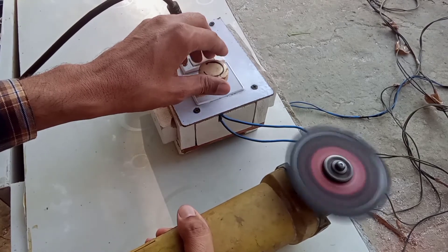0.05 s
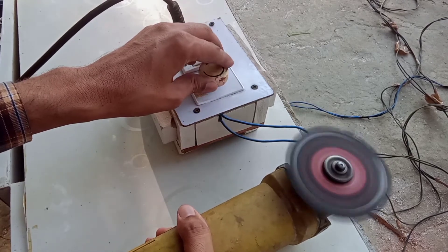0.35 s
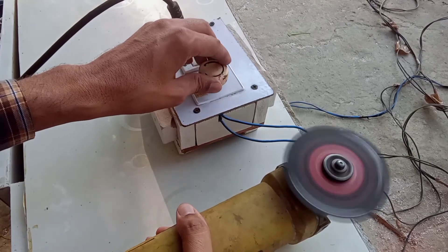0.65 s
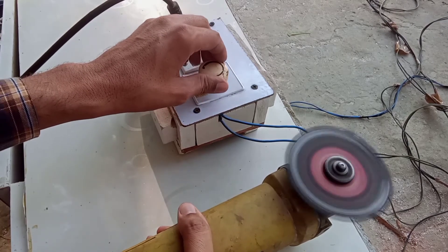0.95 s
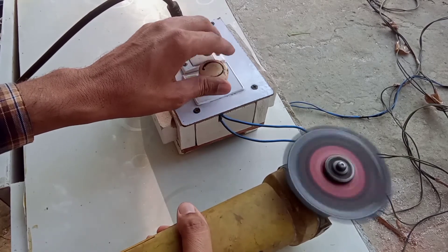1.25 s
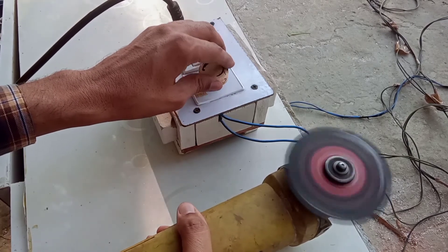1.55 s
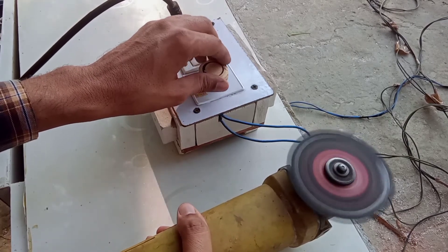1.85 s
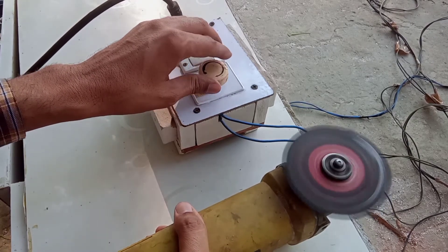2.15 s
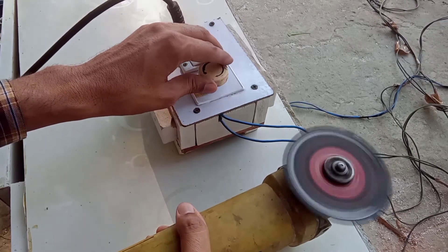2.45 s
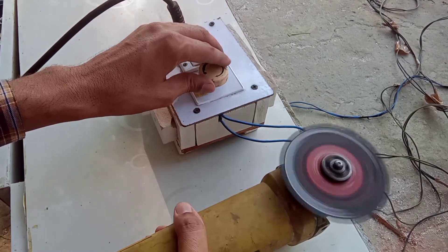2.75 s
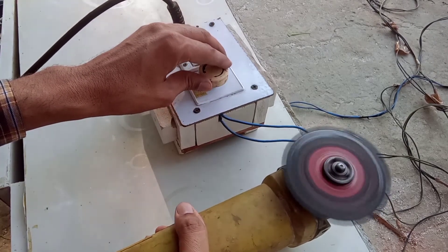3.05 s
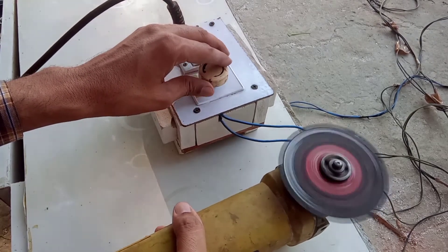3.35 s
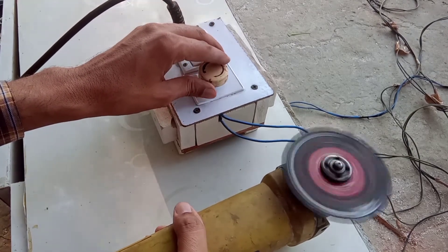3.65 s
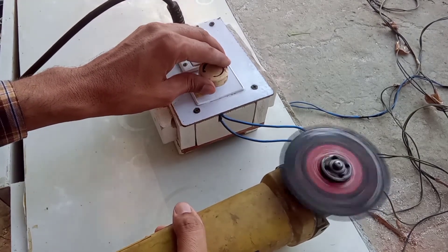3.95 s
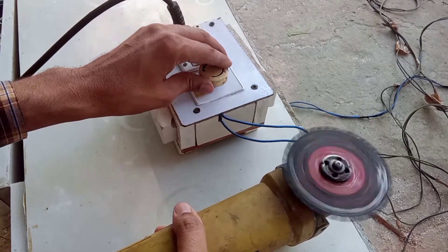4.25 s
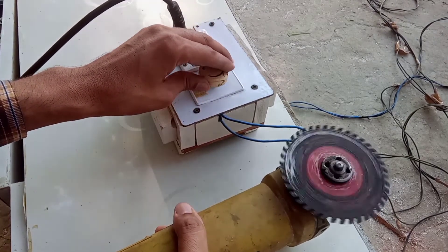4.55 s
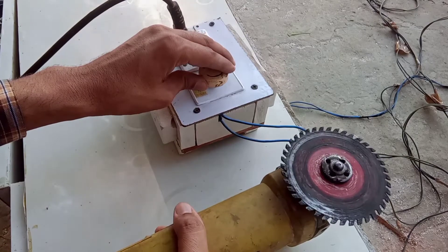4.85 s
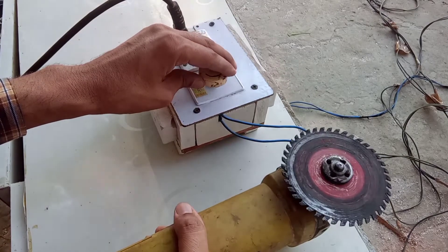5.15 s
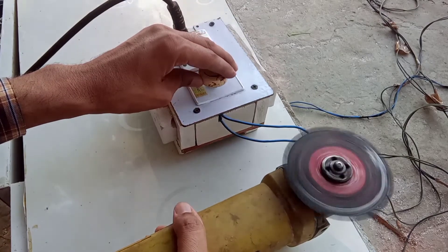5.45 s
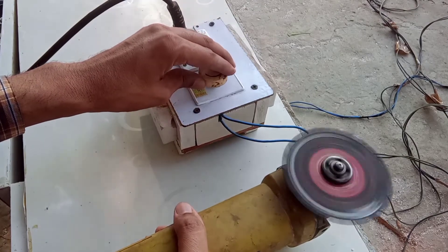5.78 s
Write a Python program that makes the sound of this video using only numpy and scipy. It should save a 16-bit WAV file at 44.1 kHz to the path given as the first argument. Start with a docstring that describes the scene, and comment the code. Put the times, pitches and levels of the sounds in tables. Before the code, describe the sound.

An angle grinder with a saw blade rattles and rings as it slows to a stop, then restarts with a clank and buzz.

```python
"""Loose gears knock and chatter close by, and every blow rings a toothed steel saw blade.
It is an angle grinder in a workshop, turned down on a dimmer dial: its whine, fan rasp and wind
fall away as it slows to a stop. A soft swish fills the pause; then the motor kicks in with a
clank, buzzes on the chopped mains and rattles up again."""
import sys
import numpy as np
from scipy import signal
from scipy.fft import rfft, irfft
from scipy.io import wavfile
from scipy.ndimage import uniform_filter1d, minimum_filter1d

SR = 44100
rng = np.random.default_rng(int(sys.argv[2]) if len(sys.argv) > 2 else 0)


def dump_mix(stems):
    """Bounce the given channels to the path in sys.argv[1] as a 16-bit WAV at rate SR."""
    frames = np.atleast_2d(stems).T  # one column per channel
    limited = np.clip(frames, -1, 1)  # hard clip at full scale
    pcm = np.round(limited * 32767).astype(np.int16)
    wavfile.write(sys.argv[1], SR, pcm)


N = 265480
TIME = np.arange(N) / SR
RESTART_S, MAINS_PULSE_HZ = 5.385, 100
FREE_FLIGHT_S, SETTLING_S = .018, .016  # teeth before and after a heavy knock


def undb(db):
    """Decibels to gain."""
    return 10 ** (np.asarray(db) / 20)


def unit(x):
    """Scale to rms 1."""
    return x / np.sqrt(np.mean(x ** 2))


def walk(rate_hz):
    """Smooth random drift, rms 1."""
    hold = int(SR / rate_hz)
    steps = np.repeat(rng.standard_normal(N // hold + 1), hold)
    return unit(uniform_filter1d(uniform_filter1d(steps, hold), hold)[:N])


def colour(x, points, size=4096):
    """Minimum-phase filter through (f/Hz, level/dB); white noise keeps its power."""
    hz, db = np.transpose(points)
    gain = unit(undb(np.interp(np.log(np.fft.rfftfreq(size, 1 / SR) + 1), np.log(hz), db)))
    cepstrum = irfft(np.log(gain))
    cepstrum[1:size // 2] *= 2
    cepstrum[size // 2 + 1:] = 0
    return signal.fftconvolve(x, irfft(np.exp(rfft(cepstrum))))[:N]


# armature rotation: t/s, f/Hz
SPEED = [(0, 102), (.7, 94.5), (1.1, 83), (1.5, 69.5), (1.95, 60), (2.7, 40.5), (3.3, 27), (4, 13),
         (4.56, 6), (4.62, 1.5), (4.77, 3), (4.82, 0), (5.38, -1), (5.42, 7), (5.7, 15), (6.02, 32.5)]

def armature():
    """Run-down, stop and restart: speed in Hz, and pace as a share of top speed."""
    speed_hz = np.maximum(np.interp(TIME, *np.transpose(SPEED)), 0)
    return speed_hz, speed_hz / speed_hz.max()


def force_db(speed_hz, knee_hz=41.7):
    """Tooth force grows with speed and levels off above the knee."""
    return 20 * np.log10(speed_hz / np.hypot(speed_hz, knee_hz) + 1e-4)


def contacts(rate_hz, scatter_db, length_s):
    """Random light contacts of uneven size, each a short scrape; rms 1."""
    clicks = (rng.random(N) < rate_hz / SR) * undb(scatter_db * np.clip(rng.standard_normal(N), -2, 2))
    power = signal.lfilter([1], [1, -np.exp(-2 / (length_s * SR))], clicks ** 2)
    return unit(np.sqrt(power) * rng.standard_normal(N))


def coasting_chatter(speed_hz, case_db=-26, blade_db=-20.5):
    """Forces on case and blade: the unloaded gears chatter more thinly as they slow."""
    force = contacts(rate_hz=200 + 6 * speed_hz, scatter_db=3.5, length_s=.0034)
    force = force / np.sqrt(uniform_filter1d(force ** 2, size=8000)) * (TIME < RESTART_S)
    tooth_db = force_db(speed_hz)
    return force * undb([case_db + 1.23 * tooth_db, blade_db + 2.6 * tooth_db])


# heavy knocks: t/s, relative level/dB, f/Hz where the blade rings most
KNOCKS = [(0.0752, -10, 2920), (0.186, -0.5, 3140), (0.2674, 3, 2970), (0.5092, -6.5, 3110),
          (0.6645, -4, 2940), (0.9442, -2, 3130), (1.055, 2, 3090), (1.1813, -13, 2900), (1.2336, -5, 3030),
          (1.495, -1, 2590), (1.517, -1, 2650), (1.6927, -2, 3110), (1.9137, 2.5, 3070),
          (1.9764, 2.5, 3050), (2.0021, 2, 2760), (2.146, 2.5, 2960), (2.2212, 1, 3120), (2.2708, 2, 2850),
          (2.3761, -5, 2610), (2.442, -2.5, 3060), (2.4621, -3, 2850), (2.55, -7, 3100), (2.802, -3, 3110),
          (2.8697, 3, 3060), (2.9905, -1.5, 2570), (3.051, -5, 3070), (3.1301, -12, 3130),
          (3.1721, -6, 3120), (3.2829, -2.5, 2880), (3.3182, -5.5, 3130), (3.3712, -8.5, 3090),
          (3.4078, -6.5, 2870), (3.452, -7, 3070), (3.4805, -6.5, 3140), (3.5702, -12, 3120),
          (3.6372, -8, 2870), (3.6742, -9.5, 2860), (3.737, -9.5, 2580), (3.7909, -7.5, 2830),
          (3.858, -10.5, 2860), (3.9, -16, 3120), (3.988, -11, 2830), (4.0468, -10.5, 3120),
          (4.1466, -12.5, 2860), (4.1928, -17, 2580), (4.2449, -15, 2840), (4.356, -19, 2850),
          (4.4023, -19, 2580), (4.4675, -25, 3098), (4.5118, -18.5, 2850), (4.5344, -23.5, 2850),
          (4.5578, -23, 3180), (4.7229, -35, 3144), (4.753, -29.5, 3110), (4.773, -35, 3110),
          (5.3856, -6.5, 3090), (5.468, -17.5, 2590), (5.5268, -14.5, 3110), (5.598, -10, 3120),
          (5.625, -8.5, 3080), (5.658, -5.5, 2850), (5.677, -8.5, 3120), (5.6924, -8.5, 3110),
          (5.7656, -11.5, 2580), (5.8705, -13, 2860), (5.96, -5.5, 3080)]
# teeth in mesh, chatter only: start/s, end/s
IN_MESH = [(.29, .36), (.565, .66)]

def knocks(speed_hz, base_rate_hz=20, per_turn=.36, rattle_db=-3.5, scatter_db=5):
    """Teeth slap across their play: heavy knocks, and a rattle between that thins as they slow."""
    heavy = np.array(KNOCKS)
    count = np.cumsum(base_rate_hz + per_turn * speed_hz) / SR
    jitter, size, tuning = rng.standard_normal((int(count[-1]) - 1, 3)).T
    times = np.interp(np.arange(len(jitter)) + .5 + .2 * jitter, count, TIME)
    tooth_db = force_db(np.interp(times, TIME, speed_hz))
    level_db = rattle_db + 1.49 * tooth_db + scatter_db * np.clip(size, -2, 1)
    ring_hz = heavy[:, 2].mean() + heavy[:, 2].std() * tuning
    gaps = IN_MESH + [(s - FREE_FLIGHT_S, s + SETTLING_S) for s in heavy[:, 0]]
    free = ~np.any([(times > start) & (times < end) for start, end in gaps], axis=0)
    rows = np.vstack([heavy, np.column_stack([times, level_db, ring_hz])[free]])
    return rows[np.argsort(rows[:, 0])].T


def blows(times, levels_db, length_s, bounce_s, bounce_db, rise_s):
    """Each blow is a short crunch followed by two weaker bounces."""
    power = np.zeros(N + SR)
    delays_s = np.cumsum(bounce_s * rng.uniform(.5, 2.3, (len(times), 2)), axis=1)
    power[(times * SR).astype(int)] += undb(levels_db) ** 2
    for k in range(2):
        power[((times + delays_s[:, k]) * SR).astype(int)] += undb(levels_db + (k + 2.5) * bounce_db) ** 2
    power = signal.lfilter([1], [1, -np.exp(-2 / (length_s * SR))], power[:N] + 1e-18)
    power = signal.lfilter([1 / (rise_s * SR)], [1, -np.exp(-1 / (rise_s * SR))], power)
    return np.sqrt(power) * rng.standard_normal(N)


def tooth_ticks(times, knock_db, speed_hz, floor_hz=3.5, loaded_db=-10):
    """A knock's bright tick follows tooth speed more than knock weight, and drops under load."""
    sharp_db = 1.02 * force_db(np.maximum(speed_hz, floor_hz))
    sharp_db += loaded_db * (TIME > RESTART_S + SETTLING_S)
    tick_db = -19 + .65 * knock_db + np.interp(times, TIME, sharp_db)
    return blows(times, tick_db, length_s=.0064, bounce_s=.0036, bounce_db=-6.5, rise_s=.00047)


# gear case spectrum: f/Hz, level/dB
CASE_COLOUR = [(150, -53), (300, -18), (480, -8), (720, -5.5), (920, -14.5), (1300, -0.5), (1470, -5),
               (1820, 8.5), (2100, -5.5), (2900, 7.5), (3450, -4), (4050, -14), (4600, -17.5), (6500, -45)]
# tooth tick spectrum: f/Hz, level/dB
TICK_COLOUR = [(2500, -19.5), (4000, 25.5), (5000, 0), (6000, -1.5), (7600, 10), (8800, 5), (9800, -13),
               (11000, -17), (12000, -18.5), (13600, -3.5), (16000, -17.5)]

def gear_case(thump, tick):
    """The case answers the teeth with a clack and a bright tick."""
    return colour(thump, CASE_COLOUR) + undb(3.5) * colour(tick, TICK_COLOUR)


def ring(force, modes, pace, stiffen, waver, patchy_db=4):
    """Driven blade modes; spin stiffens the steel and makes each pitch waver."""
    out = 0
    for hz, t60_s, db in modes:
        loss = np.log(1000) / (t60_s * SR)
        pitch_hz = hz * (1 + stiffen * pace ** 2 + waver * (.04 + pace) * walk(420))
        carrier = np.exp(2j * np.pi * np.cumsum(pitch_hz) / SR)
        share = unit(undb(patchy_db * walk(25.415)))  # depends on where the blow lands
        drive = force * share * carrier.conj() + 1e-18
        swing = signal.lfilter([2 * np.sqrt(loss)], [1, -np.exp(-loss)], drive)
        out += undb(db) * (swing * carrier).imag
    return out


# main blade modes: f/Hz, t60/s, relative level/dB
BLADE_MODES = [(2582, 0.21, -1.5), (2860, 0.15, -3), (3092, 0.11, 2)]

def struck_blade(times, knock_db, ring_hz, speed_hz, pace, spread_hz=173, twin_db=-8, build_s=.0016):
    """Each knock checks the ring and starts it anew; spin splits each mode into a beating pair."""
    latest = np.maximum(np.searchsorted(times, TIME, side="right") - 1, 0)
    age_s = TIME - times[latest]
    choke = 1 + 1.6 * pace ** 2  # fast teeth touch more often and damp the ring
    build = np.exp(-1 / (build_s * SR))  # the ring grows during tooth contact
    out = 0
    for hz, t60_s, db in BLADE_MODES:
        off_pitch = 1 - np.exp(-((hz - ring_hz) / spread_hz) ** 2)
        strike_db = knock_db - 7.5 - 10 * off_pitch
        detune, side, phase = rng.standard_normal((len(times), 3))[latest].T
        pitch_hz = hz * (1 + .002947 * detune + .01254 * pace * walk(120))
        twin = undb(twin_db) * np.exp(2j * np.pi * .86 * speed_hz * age_s * np.sign(side))
        decay = undb(strike_db[latest] + db - 60 * choke * abs(age_s) / t60_s) * (age_s >= 0)
        flutter = undb(3.5 * pace * walk(300))
        swing = decay * (1 + twin) * flutter * np.exp(2j * np.pi * phase)
        swing = signal.lfilter([1 - build], [1, -build], swing)
        out += np.sqrt(2) * np.real(swing * np.exp(2j * np.pi * np.cumsum(pitch_hz) / SR))
    return out


# weaker blade modes: f/Hz, t60/s, relative level/dB
OVERTONES = [(1970, 0.42, -32), (3500, 0.032, -26), (3750, 0.063, -14.5), (3710, 0.098, -11.5),
             (3660, .1, -8), (4960, 0.25, -30.5), (4900, 0.35, -21), (5270, .12, -27)]
# highest blade modes: f/Hz, t60/s, relative level/dB
GLINTS = [(6700, 0.11, -8.5), (6950, 0.074, -27), (7770, .035, -15.5), (7460, 0.056, -12.5),
          (8650, 0.059, -10), (8323, 0.12, -1.5), (8840, 0.14, -7.5), (10140, .06, -15)]

def driven_blade(thump, tick, chatter, pace):
    """Thumps ring the overtones, hard ticks the highest modes, chatter the main ones."""
    overtones = undb(-4.5) * ring(thump, OVERTONES, pace, stiffen=.03, waver=.035)
    glints = undb(-8) * ring(tick, GLINTS, pace, stiffen=.057, waver=.0345)
    singing = ring(chatter, BLADE_MODES, pace, stiffen=.0058, waver=.044)
    return overtones + glints + singing


def gears(speed_hz, pace, blade_cut_hz=195):
    """Knocks and chatter sound the case and the thin blade, which radiates little bass."""
    times, knock_db, ring_hz = knocks(speed_hz)
    case_chatter, blade_chatter = coasting_chatter(speed_hz) + restart_jerks()
    thump_db = knock_db - 5.5 - 12 * np.interp(times, TIME, pace)
    thump = blows(times, thump_db, length_s=.0051, bounce_s=.007, bounce_db=-4, rise_s=.0008)
    thump += case_chatter
    tick = tooth_ticks(times, knock_db, speed_hz)
    tick += case_chatter * undb(-27 + 15 * pace)  # faster teeth hit harder: brighter chatter
    steel = driven_blade(thump, tick, blade_chatter, pace)
    steel += undb(-1) * struck_blade(times, knock_db, ring_hz, speed_hz, pace)
    radiation = signal.butter(2, blade_cut_hz, "high", fs=SR, output="sos")
    return gear_case(thump, tick) + signal.sosfilt(radiation, steel)


# unbalance tones at top speed: multiple of armature speed, level/dB
UNBALANCE = [(1, -48.5), (2, -55), (3, -53)]
# fan and brush spectrum: f/Hz, level/dB
RASP_COLOUR = [(250, -22.5), (480, 1), (720, 8.5), (950, -5.5), (1200, 4), (2000, -26), (3300, 13),
               (4100, 5.5), (4800, -25.5), (6200, -12), (9000, -28.5), (12000, -36.5)]

def rotor(speed_hz, pace, whine_order=75, peak_hz=4750, width_hz=230, rasp_db=-25):
    """Unbalance drones, gear whine swells as it falls through a resonance, fan and brushes rasp."""
    angle = 2 * np.pi * np.cumsum(speed_hz * (1 + .004 * walk(150))) / SR
    drone = sum(undb(db + 1.5 * walk(4.9)) * np.sin(k * angle) for k, db in UNBALANCE)
    resonance = undb(-41.5) / (1 + ((whine_order * speed_hz - peak_hz) / width_hz) ** 2)
    whine = resonance * pace / pace.mean() * undb(2 * walk(120)) * np.sin(whine_order * angle)
    once_a_turn = 1 + .6 * np.sin(angle)
    rasp = undb(rasp_db + walk(30)) * once_a_turn * colour(rng.standard_normal(N), RASP_COLOUR)
    return pace ** 3 * drone + whine + pace ** 5 * rasp


# draught spectrum: f/Hz, level/dB
DRAUGHT_COLOUR = [(20, -31.5), (55, -20), (100, 5), (170, 1.5), (260, -10.5), (700, -23)]
# wind spectrum: f/Hz, level/dB
WIND_COLOUR = [(20, -12), (50, 0.5), (80, 3), (170, 1.5), (280, -2), (700, -24)]
# wind flurries: t/s, half length/s, boost/dB
FLURRIES = [(.04, 0.043, 6), (.47, .02, 18), (.77, .03, 13.5), (1.53, .04, 10)]

def stirred_air(speed_hz, pace, draught_db=-51.5, wind_db=-47.5):
    """The blade stirs a fluttering draught; at high speed its wind arrives in flurries."""
    flutter = undb(draught_db + .99 * force_db(speed_hz) + 1.6 * walk(17))
    draught = flutter * colour(rng.standard_normal(N), DRAUGHT_COLOUR)
    flurry_db = sum(db * np.exp(-((TIME - s) / half_s) ** 2) for s, half_s, db in FLURRIES)
    wind = pace ** 4.5 * undb(wind_db + flurry_db) * colour(rng.standard_normal(N), WIND_COLOUR)
    return draught + wind


# room noise spectrum: f/Hz, level/dB
ROOM_COLOUR = [(30, -22), (90, -4), (120, -5), (160, 6), (210, -8.5), (280, -11), (380, -11.5), (500, -16),
               (700, -10.5), (880, -16), (1050, -10), (1400, -17), (3200, -10.5), (5000, -31.5),
               (9000, -37), (14000, -59)]

def room_tone(level_db=-56):
    """Faint steady noise of the room."""
    return undb(level_db + .46 * walk(6)) * colour(rng.standard_normal(N), ROOM_COLOUR)


def workshop(x, t60_s=.47, wet_db=-13, dull_hz=5000):
    """Bench, floor and walls add a short, slightly dull tail."""
    t = TIME[:SR // 2]
    tail = rng.standard_normal(len(t)) * undb(-60 * t / t60_s) * (t > .004)
    tail = signal.sosfilt(signal.butter(1, dull_hz, fs=SR, output="sos"), tail)
    return x + undb(wet_db) * signal.fftconvolve(x, tail / np.linalg.norm(tail))[:N]


# blows that ping the blade: t/s, level/dB
PINGS = [(2.357, -29), (2.99, -30.5), (5.385, -39.5)]

def blade_pings(low_hz=4930, high_hz=5060, t60_s=.23):
    """A close pair of high blade modes rings out after a few blows."""
    out = 0
    for s, db in PINGS:
        age_s = np.maximum(TIME - s, 0)
        pair = np.sin(2 * np.pi * low_hz * age_s) + .32 * np.sin(2 * np.pi * high_hz * age_s)
        out += undb(db - 60 * age_s / t60_s) * pair
    return out


# swish envelope: t/s, relative level/dB
SWISH_SWELL = [(4.95, -68.5), (5, -52), (5.14, -41), (5.22, -57), (5.34, -73)]
# swish spectrum: f/Hz, level/dB
SWISH_COLOUR = [(1000, -24), (1700, -13), (2100, -2.5), (2700, 5.5), (3100, -1.5), (4300, -5),
                (4800, -17.5), (9000, -30), (14000, -58)]

def swish(trim_db=-2):
    """A soft swell of rubbing noise while the dial is turned back up."""
    swell_db = np.interp(TIME, *np.transpose(SWISH_SWELL), left=-120, right=-120)
    swell = uniform_filter1d(undb(swell_db + trim_db), size=400)
    return swell * colour(contacts(rate_hz=1500, scatter_db=1, length_s=.0012), SWISH_COLOUR)


def restart_jerks(case_db=-32, blade_db=-34):
    """Forces on case and blade: each half wave of the chopped mains jerks the gears."""
    jerks = unit(2.1 + np.exp(-(MAINS_PULSE_HZ * TIME % 1) / .3)) * (TIME > RESTART_S)
    force = jerks * contacts(rate_hz=330, scatter_db=2.5, length_s=.0026)
    return np.outer(undb([case_db, blade_db]), force)


# magnetic hum: multiple of mains pulse rate, relative level/dB
HUM = [(1, -3), (2, -3), (3, -12), (4, -0.5), (5, -5), (7, -7)]

def winding_hum(level_db=-44.5, hold_s=.31, fade_db_per_s=55):
    """The windings hum on the chopped mains, fading as the starting current falls."""
    cycles = MAINS_PULSE_HZ * TIME
    hum = sum(undb(db + 1.5 * walk(14)) * np.sin(2 * np.pi * (k * cycles + rng.random()))
              for k, db in HUM)
    age_s = TIME - RESTART_S
    envelope = (age_s > 0) * undb(level_db - fade_db_per_s * np.maximum(age_s - hold_s, 0))
    return uniform_filter1d(envelope, size=400) * hum


# current snap spectrum: f/Hz, level/dB
SNAP_COLOUR = [(2500, -34), (3700, -2), (4400, 8), (4900, -15), (5800, -40)]

def current_snaps(level_db=-42, length_s=.0016, scatter_db=4):
    """Each half wave's surge of current snaps in the motor, no two alike."""
    cycles = MAINS_PULSE_HZ * TIME
    sizes = undb(scatter_db * np.clip(rng.standard_normal(int(cycles[-1]) + 1), -2, 2))
    age_s = (cycles % 1) / MAINS_PULSE_HZ
    bursts = unit(sizes[cycles.astype(int)] * np.exp(-age_s / length_s) * rng.standard_normal(N))
    return undb(level_db) * colour(bursts * (TIME > RESTART_S), SNAP_COLOUR)


def scene():
    """Grinder and dial in the workshop, over its faint noise."""
    speed_hz, pace = armature()
    grinder = gears(speed_hz, pace) + blade_pings() + winding_hum() + current_snaps()
    grinder += rotor(speed_hz, pace) + stirred_air(speed_hz, pace)
    return (room_tone() + workshop(grinder + swish()))[None]


def record(dry, ceiling=.85, bass_hz=55, top_hz=15500):
    """Bass cut, fast peak limiter, steep top cut."""
    thin = signal.sosfilt(signal.butter(2, bass_hz, "high", fs=SR, output="sos"), dry)
    gain = minimum_filter1d(ceiling / np.maximum(abs(thin), ceiling), size=300)
    limited = thin * uniform_filter1d(gain, size=200)
    return signal.sosfilt(signal.ellip(10, .2, 80, top_hz, fs=SR, output="sos"), limited)


dry = scene()
out = record(dry)
dump_mix(out)
```